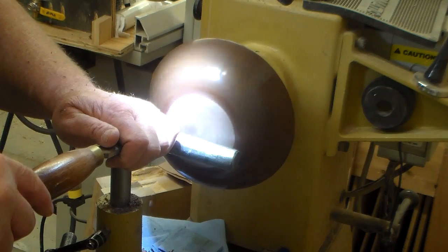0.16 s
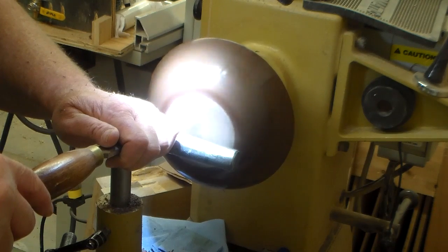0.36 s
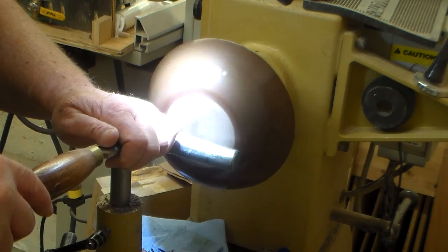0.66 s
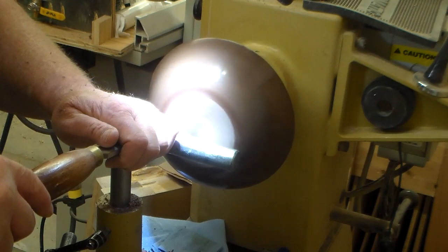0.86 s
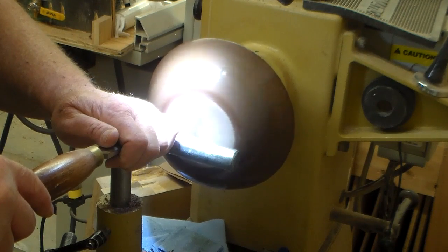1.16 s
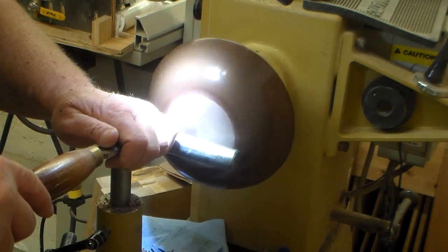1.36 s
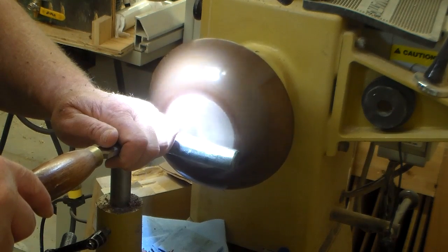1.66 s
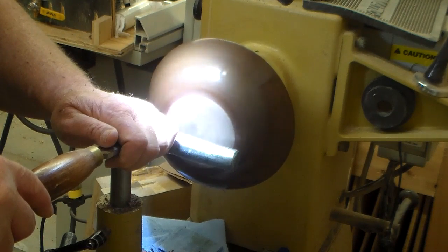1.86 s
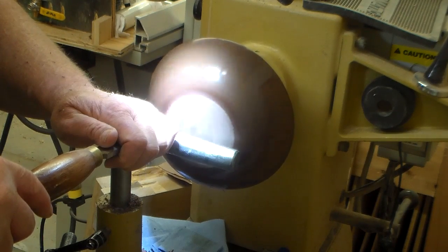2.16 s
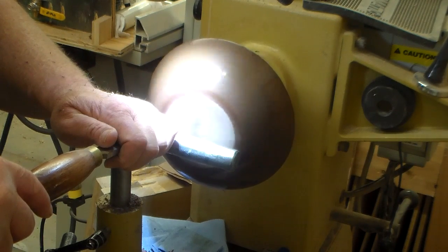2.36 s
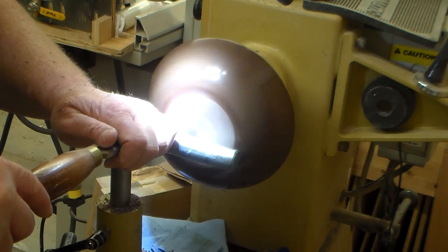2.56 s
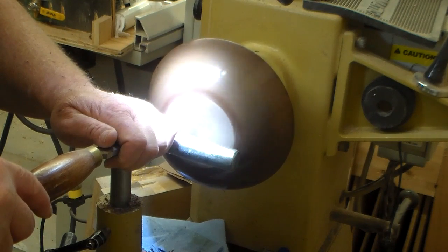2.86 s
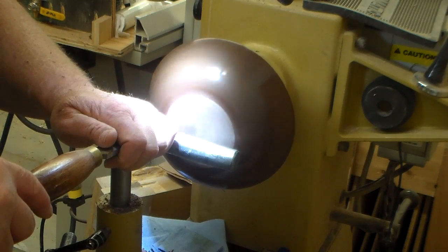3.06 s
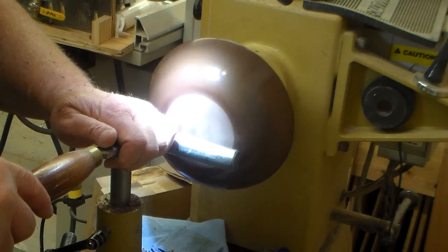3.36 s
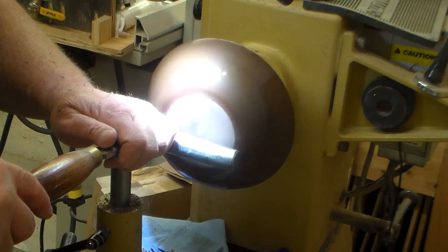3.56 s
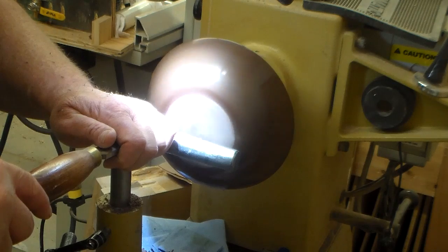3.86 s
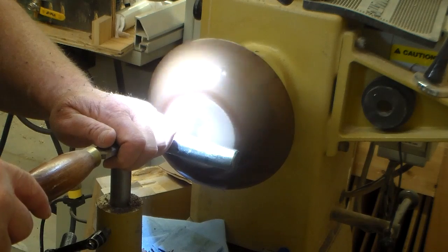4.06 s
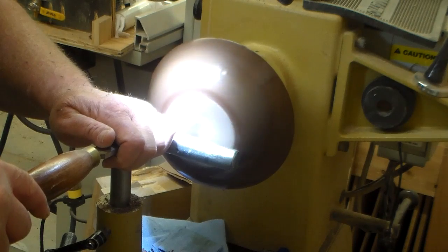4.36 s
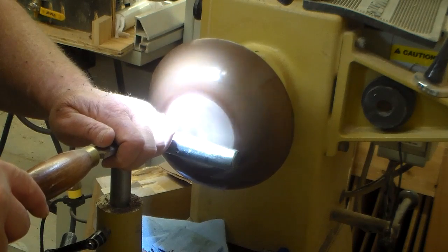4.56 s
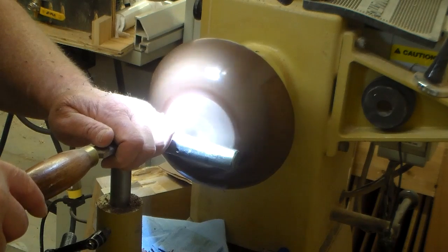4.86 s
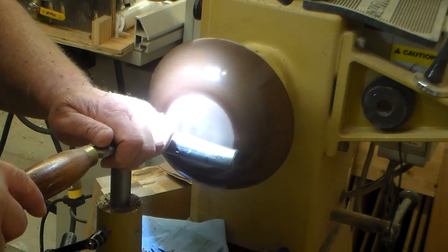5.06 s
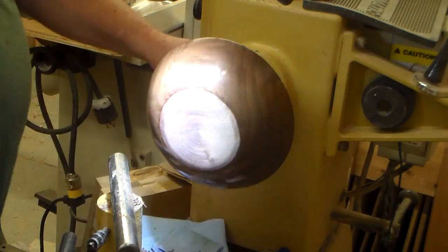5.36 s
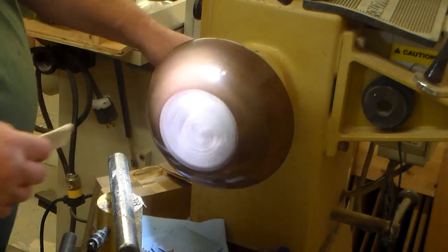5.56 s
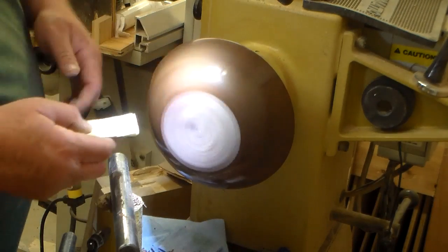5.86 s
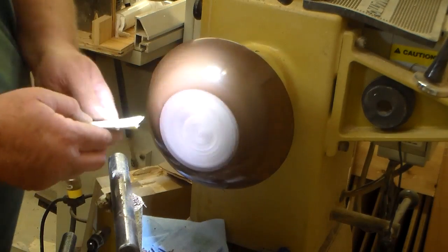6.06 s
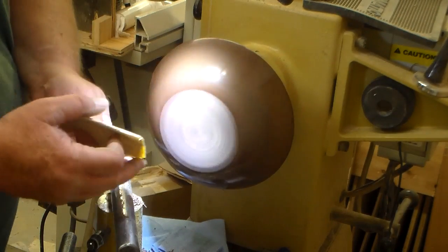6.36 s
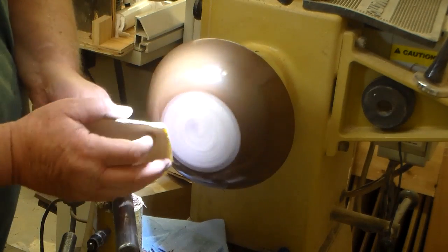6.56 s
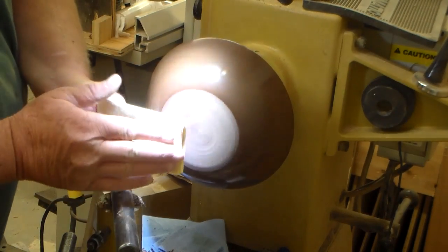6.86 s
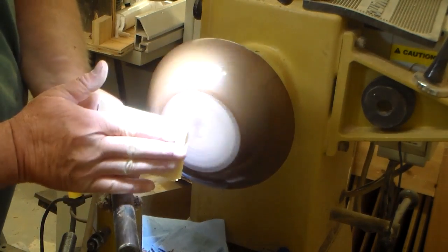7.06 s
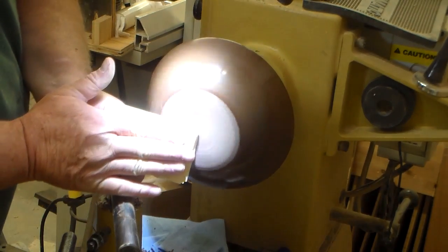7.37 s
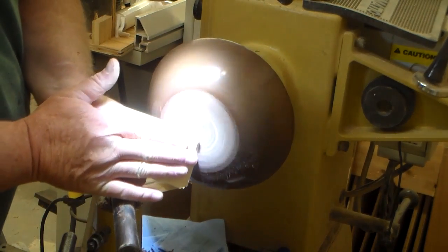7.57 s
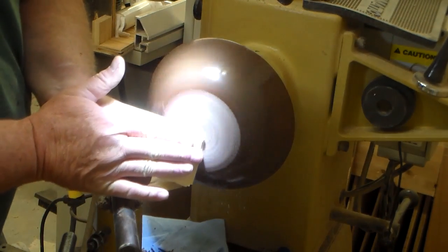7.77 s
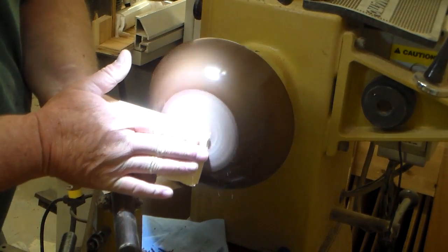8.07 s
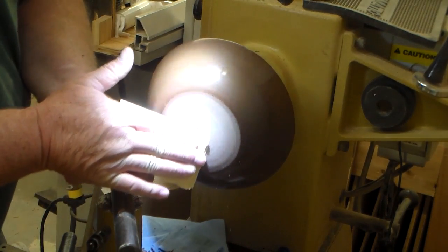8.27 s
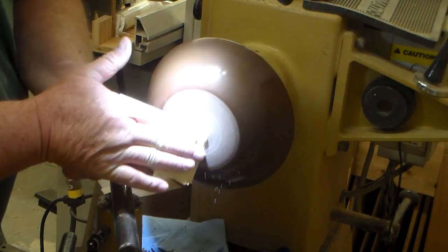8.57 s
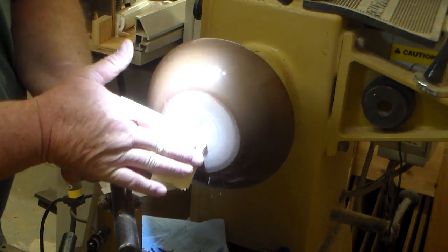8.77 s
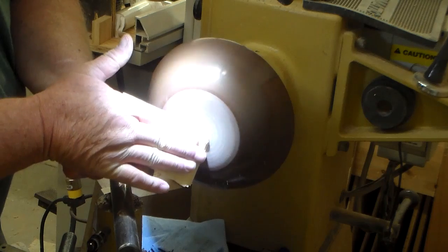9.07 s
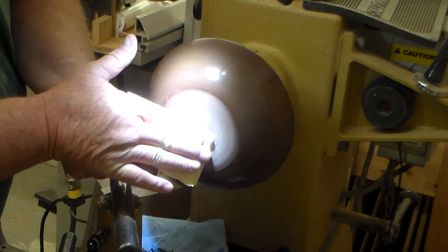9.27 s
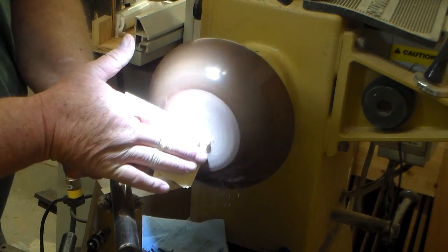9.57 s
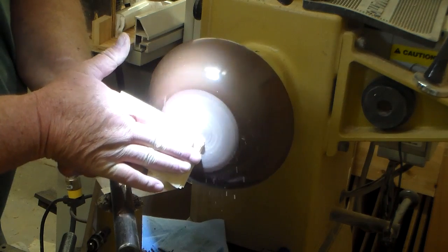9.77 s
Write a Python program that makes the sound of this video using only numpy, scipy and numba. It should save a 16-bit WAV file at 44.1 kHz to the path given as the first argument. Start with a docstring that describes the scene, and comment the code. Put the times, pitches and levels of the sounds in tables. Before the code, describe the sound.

Fast fluttering scrape on a turning wooden bowl over motor hum, cut off abruptly, a hard clack, faint paper rustles, then bright gritty sanding.

```python
"""A small workshop: a wood lathe hums and whines, made of wavering tones, coloured noise and narrow noise
bands. A scraper rides the foot of a spinning bowl, its noise repeating every turn and chattering on the end
grain. The scene changes as the scraping breaks off; the tool rest slides into a sharp knock of decaying modes,
noise crack and echo. Fingers rustle on sandpaper, then a sanding block is pressed on the wood as noise gripped
unevenly each turn. A gain control rides the whole mix, ducking quickly and letting go after a hold."""
import sys
import numpy as np
from scipy import signal
from scipy.fft import rfft, irfft
from scipy.io import wavfile
from scipy.ndimage import uniform_filter1d
from numba import njit

SR = 44100
rng = np.random.default_rng(int(sys.argv[2]) if len(sys.argv) > 2 else 0)


def master(y):
    """Save y as 16-bit WAV."""
    cut = np.clip(np.atleast_2d(y).T, -1, 1)
    pcm = np.round(cut * 32767)  # scale
    wavfile.write(sys.argv[1], SR, pcm.astype(np.int16))


N = 437472
T = np.arange(N) / SR  # s
SIZE = 2 ** 14  # filter length, samples
FREQ = np.maximum(np.arange(SIZE // 2 + 1) * SR / SIZE, 1)  # Hz
SPINDLE_HZ = 11.72  # turns of the bowl per second
SCRAPE_END_S = 5.388


def undb(db):
    """Decibels to gain."""
    return 10 ** (np.asarray(db) / 20)


def noise():
    """Unrelated white noises for two channels."""
    return rng.standard_normal((2, N))


def walk(rate_hz):
    """Random drift with a spread near 1, through 2000 points at the given rate, then held."""
    knots = rng.standard_normal(2000)
    return 1.2 * np.interp(T * rate_hz, np.arange(len(knots)), knots)


def fade(t, t60):
    """Exponential decay that starts at t = 0 and drops 60 dB in t60 seconds."""
    return (t >= 0) * undb(-60 * np.maximum(t, 0) / t60)


def swell(start_s, rise_s):
    """A smooth step from 0 to 1."""
    progress = np.clip((T - start_s) / rise_s, 0, 1)
    return .5 - .5 * np.cos(np.pi * progress)


def shape(points, modes=()):
    """Response in dB: a broad slope with resonant peaks and dips on it."""
    hz, db = np.transpose(points)
    slope = np.interp(np.log(FREQ), np.log(hz), db)
    return slope + sum(lift / (1 + (2 * (FREQ - f) / width) ** 2) for f, width, lift in modes)


def band(low_hz, high_hz):
    """Steep band-pass response in dB, with a floor at -70 dB."""
    edges = (1 + (low_hz / FREQ) ** 20) * (1 + (FREQ / high_hz) ** 20)
    return np.maximum(-10 * np.log10(edges), -70)


def ripple(spacing_hz):
    """Fine random peaks and dips in dB, like those of many small modes."""
    knots = rng.standard_normal(4000)
    return np.interp(FREQ / spacing_hz, np.arange(len(knots)), knots)


def colour(x, db):
    """Causal minimum-phase filter with the given response in dB; the first row comes out at rms 1."""
    cepstrum = irfft(db * np.log(10) / 20)
    # folding the cepstrum onto positive time makes the filter causal
    cepstrum[1:SIZE // 2] *= 2
    cepstrum[SIZE // 2 + 1:] = 0
    impulse = irfft(np.exp(rfft(cepstrum)))
    y = signal.oaconvolve(x, impulse[None], axes=1)[:, :N]
    return y / np.std(y[0])


def surface(memory):
    """Roughness noise that comes round again every turn, part of it renewed on each pass."""
    keep = np.clip(memory, 0, .99)
    turn = round(SR / SPINDLE_HZ)
    passes = rng.standard_normal((N // turn + 1, 2, turn))
    for k in range(1, len(passes)):
        passes[k] = keep * passes[k - 1] + np.sqrt(1 - keep ** 2) * passes[k]
    return np.hstack(passes)[:, :N]


def patch(angle, rise, fall):
    """A bump each time one spot of the bowl passes the tool; all three in turns."""
    away = (T * SPINDLE_HZ - angle + .5) % 1 - .5
    return np.exp(-.5 * (away / np.where(away < 0, rise, fall)) ** 2)


def tones(lines, waver_db, drift_hz):
    """Machine tones, each a sine that wavers in level and pitch."""
    total = 0
    for hz, db in lines:
        level = undb(db + waver_db * walk(6)) * np.sqrt(2)
        cycles = np.cumsum(hz + drift_hz * walk(5)) / SR + rng.random()
        total = total + level * np.sin(2 * np.pi * cycles)
    return total


def spread(x, width):
    """Left and right from a centre and a side signal, the side weighted by frequency."""
    mid, side = x
    side_db = np.interp(np.arange(N // 2 + 1) * SR / N, FREQ, shape(width))
    side = irfft(rfft(side) * undb(side_db), N)
    return np.array([mid + side, mid - side])


# tone colour of the low rumble: f/Hz, relative level/dB
RUMBLE_COLOUR = [(10, -10), (28, 0), (60, -7), (120, -13), (250, -22), (1000, -45), (4000, -70)]


def rumble():
    """A faint, wide rumble of low noise while the wood is being worked."""
    working = (T < SCRAPE_END_S) + swell(PUSHES[0][0], rise_s=.4)
    return undb(-49.5) * working * colour(noise(), shape(RUMBLE_COLOUR))


# steady hum of the running machine: f/Hz, rms level/dB
HUM_TONES = [(58.7, -58.5), (120, -59), (148.5, -55.5), (177, -66), (209.5, -56), (240, -67), (301, -64),
             (325, -69), (360, -58), (387.5, -52), (513, -56.5), (528.3, -49.5), (563, -69.5)]
# bearing tones, before their common trim: f/Hz, relative rms level/dB
BEARING_LINES = [(705.2, -51), (823.6, -48.5), (888.2, -56.5), (1071, -53.5), (1297, -59), (1502, -59),
                 (1588, -46), (1626, -55)]
# rush of belt, fan and bearings: f/Hz, relative level/dB
RUSH_COLOUR = [(12, -31), (24, -10), (60, -7), (120, -12), (250, -4.5), (1200, -5.5), (1750, -7.5),
               (2100, -11), (3200, -13), (4800, -15.5), (6500, -22), (9500, -20), (14000, -30.5)]
# resonances of the headstock casing: f/Hz, width/Hz, lift/dB
CASING_MODES = [(29, 17, 11), (100, 45, -5), (167, 43, -8), (270, 100, -6), (666, 140, -5), (807, 44, 3.5),
                (1061, 82, 8.5), (1372, 86, 5.5), (1660, 280, 5.5), (3250, 210, 4.5), (3760, 450, -7.5),
                (4330, 330, 4.5), (7900, 2200, -5)]
# whine of the motor's speed controller: f/Hz, width/Hz, relative level/dB
WHINE_BANDS = [(9400, 200, -17), (10300, 150, -6), (9940, 220, -7), (10150, 100, -4), (10660, 150, -12),
               (10600, 170, -7.5)]
MOTOR_HZ, MOTOR_DB = 266.3, -44.5
# bearing tones, rush and whine are fainter at first and swell up after the knock
DULL_RUSH_DB, DULL_WHINE_DB = -2, -4
OPEN_S, OPEN_LENGTH_S = 5.61, 0.54


def lathe():
    """Motor hum, bearing tones, the rush of belt and fan in the casing, and the controller's whine."""
    hum = tones([(MOTOR_HZ, MOTOR_DB)] + HUM_TONES, waver_db=0.9, drift_hz=0.34)
    bearings = undb(-2.5) * tones(BEARING_LINES, waver_db=1.0, drift_hz=2.22)
    turning = surface(memory=0.28) * undb(0.93 * walk(25))
    rush = colour(turning, shape(RUSH_COLOUR, CASING_MODES) + 2.4 * ripple(30))
    whine_power = sum(undb(db) ** 2 / (1 + (2 * (FREQ - f) / width) ** 2) ** 2
                      for f, width, db in WHINE_BANDS)
    whine = colour(noise(), 10 * np.log10(whine_power))
    dulled = 1 - swell(OPEN_S, OPEN_LENGTH_S)
    rush_gain = undb(DULL_RUSH_DB * dulled)
    centred_tones = np.outer([1, 0], hum + rush_gain * bearings)
    whine_gain = undb(-49.0 + DULL_WHINE_DB * dulled)
    return centred_tones + undb(-35.0) * rush_gain * rush + whine_gain * whine


# fingers shifting on the sanding block: t/s, level/dB
FINGER_RUSTLES = [(6.228, -38), (6.445, -40), (6.622, -39), (6.76, -46), (6.842, -39), (6.87, -43),
                  (7.262, -47)]


def handling():
    """Short dry rustles of sandpaper under the fingers: decaying bursts of one coloured noise."""
    touches = sum(undb(db) * fade(T - s, t60=0.13) for s, db in FINGER_RUSTLES)
    return touches * colour(noise(), shape([(500, -20), (2500, 4), (6000, -2), (14000, -18)]))


# tool rest sliding on the bed: f/Hz, relative level/dB
SLIDE_COLOUR = [(40, -25), (150, -10), (240, 4), (420, -2), (600, -9), (1100, -24), (1800, -22),
                (3800, -13.5), (4600, -14), (6000, -19), (14000, -36)]
# ringing modes of the knock: f/Hz, relative level/dB, t60/s
KNOCK_RING = [(342, -4.5, 0.23), (417, -17, 0.22), (707, -5, 0.097), (1350, -6, .04), (2800, -1, .03),
              (3420, -3.5, 0.047), (3620, -10, .35), (4480, 2, .1)]
# colour of the crack: f/Hz, relative level/dB
CRACK_COLOUR = [(30, -50), (150, -20), (380, 1.5), (800, -2.5), (3000, 2), (4400, 6), (5500, -10),
                (14000, -13)]
# colour the workshop's echo adds to the crack: f/Hz, relative level/dB
ECHO_COLOUR = [(100, 14), (1000, -4.5), (2500, -3), (3800, -5), (5000, -2), (8000, -0.5), (14000, -12)]
KNOCK_S, KNOCK_DB = 5.5375, 3


def knock():
    """The tool rest slides and hits its stop: a crack, short modes, close reflections and the workshop's echo."""
    t = T - KNOCK_S
    sliding = (T > SCRAPE_END_S) * (t < 0)
    slide = undb(-38) * colour(noise(), shape(SLIDE_COLOUR)) * sliding
    modes = sum(undb(db) * fade(t, t60) * np.cos(2 * np.pi * hz * t) for hz, db, t60 in KNOCK_RING)
    crack = colour(noise(), shape(CRACK_COLOUR))
    direct = crack * (fade(t, 0.011) + undb(-10.5) * fade(t - .004, 0.11))  # reflections 4 ms later
    echo = undb(-22.5) * colour(crack, shape(ECHO_COLOUR)) * fade(t - .01, 0.74)
    return slide + undb(KNOCK_DB) * (undb(-14.5) * np.outer([1, 0], modes) + direct + echo)


# pushes of the hand on the block: t/s, rise/s, bite level/dB, settling time/s, lasting level/dB
PUSHES = [(7.566, 0.088, -27, .13, -31.5), (7.87, 0.167, -30, .3, -32)]
# a first light graze
GRAZE_S, GRAZE_RISE_S, GRAZE_DB = 7.48, .1, -42.5


def pressure():
    """The block grazes the bowl and stays on it; each push of the hand bites hard, then settles."""
    total = undb(GRAZE_DB) * swell(GRAZE_S, GRAZE_RISE_S)
    for start_s, rise_s, bite_db, settle_s, held_db in PUSHES:
        settling = np.exp(-np.maximum(T - start_s - rise_s, 0) / settle_s)
        total = total + swell(start_s, rise_s) * (undb(held_db) + undb(bite_db) * settling)
    return total


# colour of the scratches: f/Hz, relative level/dB
SCRATCH_COLOUR = [(40, -27), (200, -14.5), (400, -5.5), (700, -9.5), (1200, -3), (1700, -3), (2300, 3.5),
                  (2900, -0.5), (3700, 0.5), (4400, 3.5), (5400, 4), (6200, 0), (7100, 1.5), (8200, -4),
                  (9500, -0.5), (11500, -6), (14000, -5.5)]
# the scratches brighten as the grit wears in
WEAR_S, WEAR_RISE_S, WEAR_LIFT_DB = 8.19, 0.57, 3.5


def sanding():
    """Grit scratches as dense noise; the block rocks with each turn and grips unevenly."""
    bite_db = WEAR_LIFT_DB * swell(WEAR_S, WEAR_RISE_S)
    flutter = undb(0.77 * walk(28) + 2.3 * walk(253.6))  # the faster drift holds still from 7.9 s on
    rocking = 1 + 0.21 * patch(0.49, 0.068, .07) + 0.32 * patch(0.96, 0.066, .1)
    gripped = surface(memory=0.089) * flutter * rocking
    scratches = colour(gripped, shape(SCRATCH_COLOUR) + 3.15 * ripple(32))
    dull = signal.sosfiltfilt(signal.butter(2, 7500, fs=SR, output="sos"), scratches)
    bright = scratches - dull
    return pressure() * (dull * undb(-.6 * bite_db) + bright * undb(bite_db))


# broad colour of the cut: f/Hz, relative level/dB
SHAVING_COLOUR = [(40, -27), (120, -18), (200, -4), (400, -17.5), (700, -7.5), (1600, -8.5), (2800, -1.5),
                  (4800, 0.5), (7000, -3), (9600, -6), (11000, -11), (14000, -11)]
# resonances of tool, rest and bowl under the cut: f/Hz, width/Hz, lift/dB
CUT_MODES = [(817, 64, 9.5), (921, 184, 12.5), (1413, 115, 10.5), (2144, 210, 8), (2316, 173, 17),
             (2560, 58, 7), (2850, 75, 2), (3070, 143, 13.5), (3536, 68, 8), (3760, 100, -3.5),
             (4310, 100, 6.5), (5200, 98, 8), (5910, 190, -3.5), (6636, 92, 5.5), (6640, 89, 2),
             (7250, 37, 8), (7730, 600, -5.5), (8640, 210, 6.5), (9240, 160, 5.5), (10060, 150, 6)]
# as the surface smooths, the hiss grows a little and the bowl rings less
HISS_DB, HISS_DB_PER_S = -28, 0.27
RING_DB, RING_DB_PER_S = -27, -0.33
# the steel sings louder as the cut goes on
SING_DB, SING_GROWTH_DB, SING_FULL_S = -45, 6, 3.8
# the second patch of end grain is steadily cut away; it catches again when the tool shifts
SECOND_DB, SECOND_DB_PER_S = 9.5, -2.07
SHIFT_S, SHIFT_WIDTH_S, SHIFT_DB = 4.75, .22, 5.5


def scraper():
    """The edge reads nearly the same surface every turn and bites hardest on two patches of end grain."""
    ring_gain = undb(RING_DB + RING_DB_PER_S * T)
    hiss_gain = undb(HISS_DB + HISS_DB_PER_S * T)
    shift = np.exp(-.5 * ((T - SHIFT_S) / SHIFT_WIDTH_S) ** 2)
    second_db = SECOND_DB + SECOND_DB_PER_S * T + SHIFT_DB * shift
    second = undb(second_db) * patch(.925, .03, .055)
    body = shape(SHAVING_COLOUR, CUT_MODES) + 1.5 * ripple(35)
    # the shaft is pushed aside first, then the bowl rings and the fibres tear
    push = 1 + 1.4 * patch(.42, .025, .045) + .5 * patch(.86, .04, .04)
    chatter = 1 + 3 * patch(.475, .045, .08) + second
    tear = 1 + 2.55 * patch(.485, .03, .07) + .45 * patch(.41, .07, .03) + .5 * second
    shaft = colour(surface(memory=0.96) * push, body + band(33, 1700))
    ring = colour(surface(memory=0.875) * chatter, body + band(1540, 2800))
    torn = surface(memory=0.66) * tear * undb(0.52 * walk(190))
    hiss = colour(torn, body + band(3114, 12400))
    # between the bites the steel keeps singing and fine dust hisses
    steel_db = shape([(3000, -43.5), (4320, -22), (6000, -47.0)], [(4310, 400, 19)]) + band(3440, 4960)
    steel = colour(surface(memory=0.9), steel_db)
    singing = undb(SING_DB + SING_GROWTH_DB * np.minimum(T / SING_FULL_S, 1)) * steel
    dust = undb(-40) * colour(noise(), band(8000, 18400))
    cut = undb(-34.5) * shaft + ring_gain * ring + hiss_gain * hiss + singing + dust
    return cut * (T < SCRAPE_END_S)


# stereo width of the machine, side minus mid: f/Hz, level/dB
MACHINE_WIDTH = [(30, -5), (120, -9), (300, -16), (1000, -16.5), (2000, -16), (3000, -8.5), (7000, -.5),
                 (14000, 0)]
# stereo width of the work on the bowl, side minus mid: f/Hz, level/dB
BOWL_WIDTH = [(250, -11), (1200, -17), (2200, -22), (3000, -14), (4200, -7.5), (7700, -0.5), (14000, -3.5)]


def scene():
    """Machine, knock and handling share one stereo width, the work on the bowl another; treble spreads widest."""
    machine = spread(lathe(), MACHINE_WIDTH) + spread(knock() + handling(), MACHINE_WIDTH)
    work = spread(scraper(), BOWL_WIDTH) + spread(sanding(), BOWL_WIDTH)
    stereo = rumble() + machine + work
    # the whole sound leans slightly to the right from 7.3 to 9.2 s, then stays there
    lean = undb(np.interp(T, [7.3, 9.2], [0, -.5]))
    return stereo * np.array([lean, 1 / lean])


@njit
def duck(over_db, start_db, attack, hold, release, margin):
    """Gain reduction in dB: quick to rise, held while the sound stays near its peak, then let go; times in s."""
    out, cut, wait = np.zeros(len(over_db)), start_db, hold
    for i in range(len(over_db)):
        wait -= 1 / SR
        if over_db[i] > cut - margin:
            wait = hold
        if over_db[i] > cut:
            cut += (over_db[i] - cut) / (attack * SR)
        elif wait < 0:
            cut -= cut / (release * SR)
        out[i] = cut
    return out


def record(dry):
    """A gain control rides the loud passages, the sharpest peaks are rounded and the top is cut off."""
    follow = 1 / (.009 * SR)  # 9 ms level follower
    power = signal.lfilter([follow], [1, follow - 1], np.mean(dry ** 2, axis=0))
    over_db = 10 * np.log10(power + 1e-12) + 23.5  # level above -23.5 dB
    cut_db = duck(over_db, start_db=4.0, attack=0.00024, hold=0.446, release=0.11, margin=0.34)
    ridden = dry * undb(-uniform_filter1d(cut_db, size=130))  # the gain glides over 3 ms
    rounded = ridden / (1 + (ridden / .38) ** 4) ** .25
    top_cut = signal.ellip(14, .2, 70, 14150, fs=SR, output="sos")  # low-pass at 14150 Hz
    return signal.sosfilt(top_cut, rounded)


dry = scene()
out = record(dry)
master(out)
```